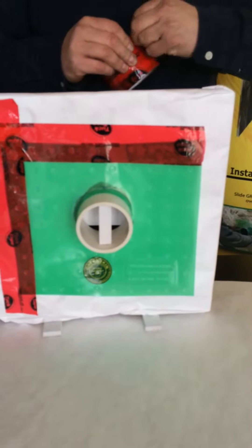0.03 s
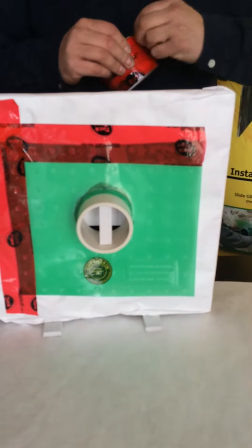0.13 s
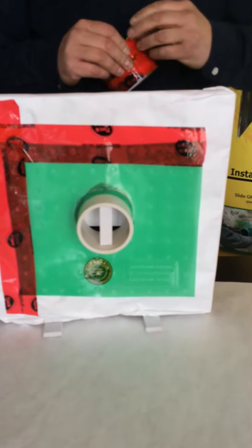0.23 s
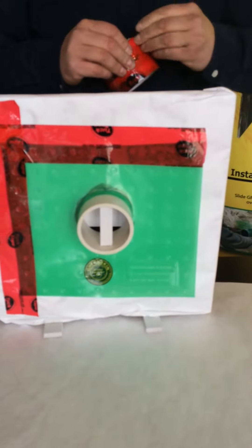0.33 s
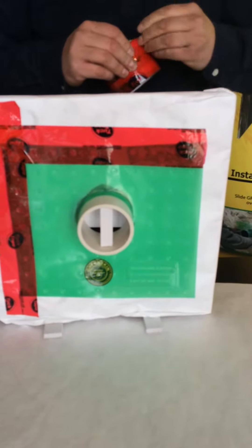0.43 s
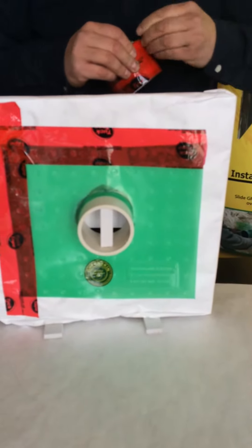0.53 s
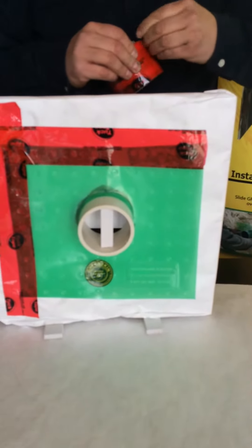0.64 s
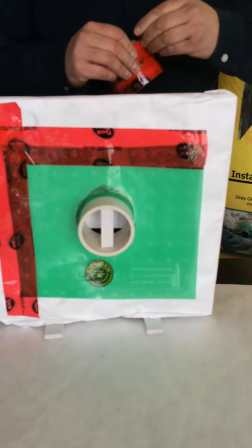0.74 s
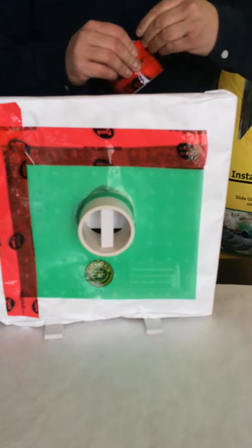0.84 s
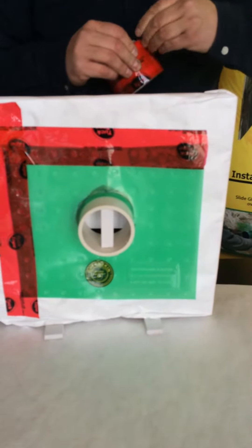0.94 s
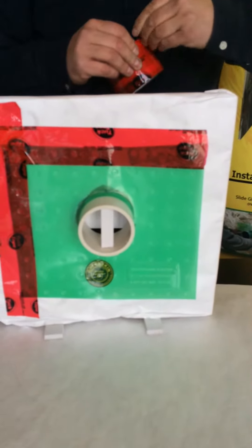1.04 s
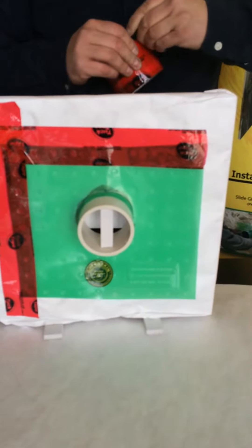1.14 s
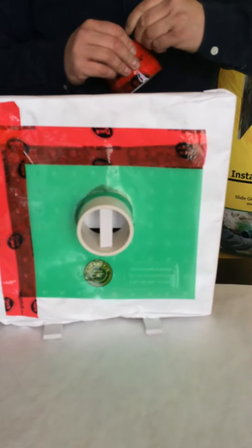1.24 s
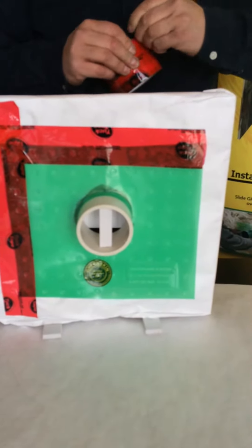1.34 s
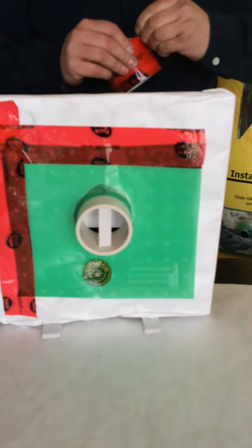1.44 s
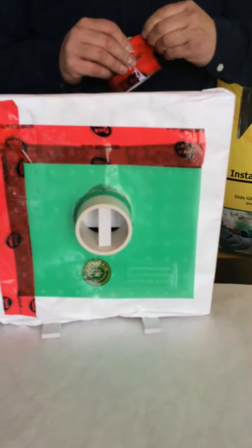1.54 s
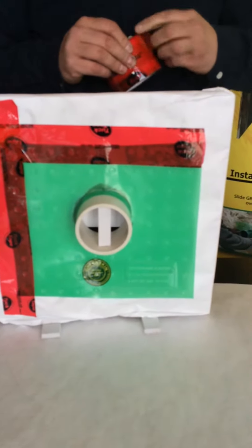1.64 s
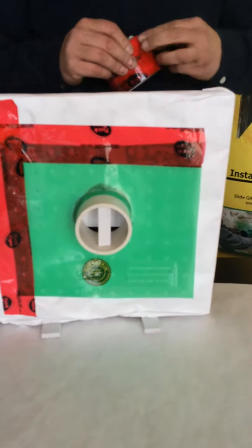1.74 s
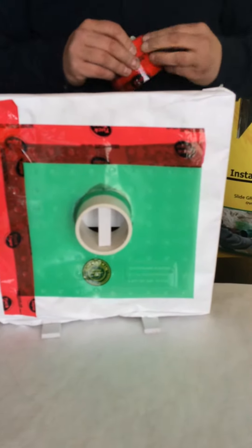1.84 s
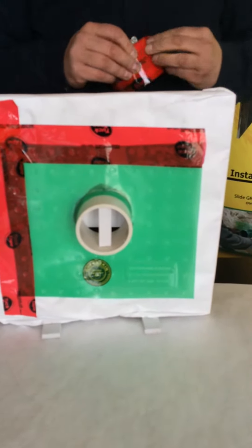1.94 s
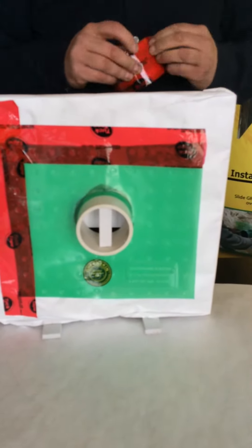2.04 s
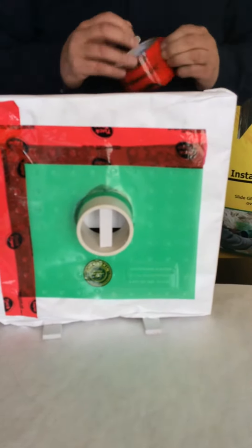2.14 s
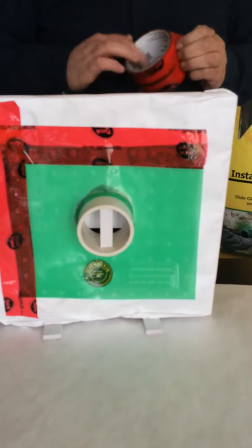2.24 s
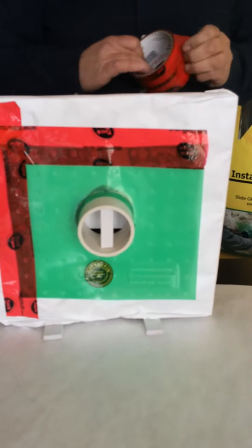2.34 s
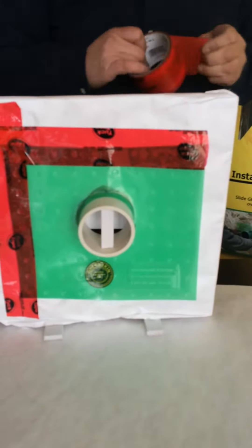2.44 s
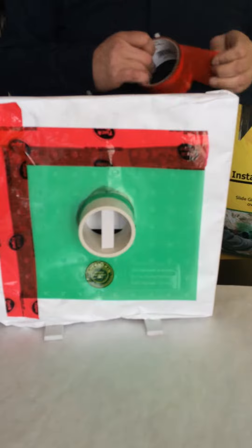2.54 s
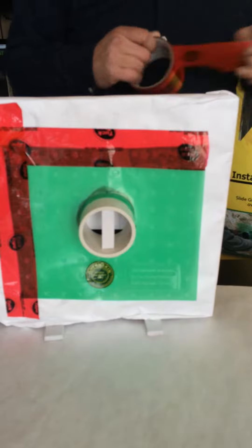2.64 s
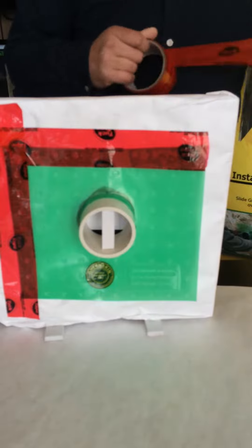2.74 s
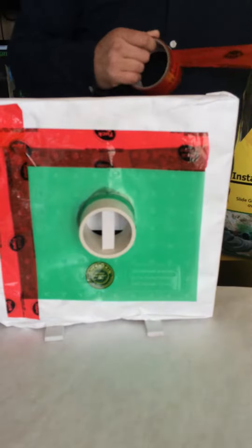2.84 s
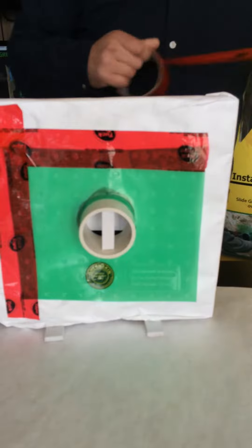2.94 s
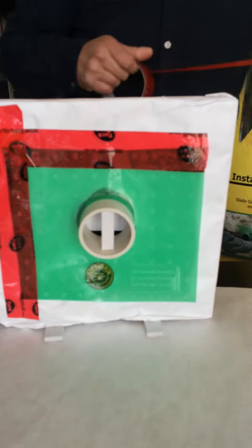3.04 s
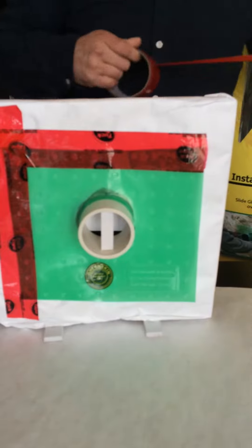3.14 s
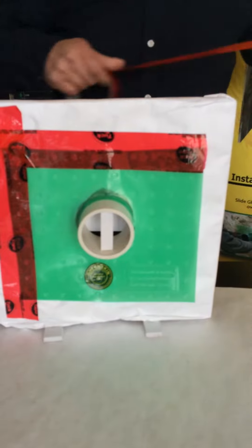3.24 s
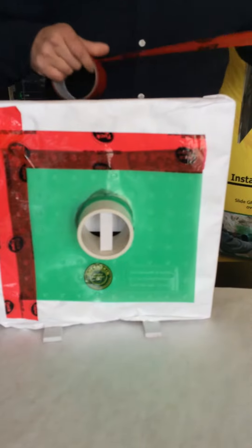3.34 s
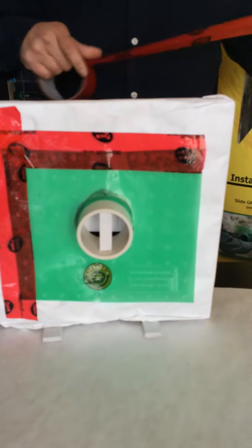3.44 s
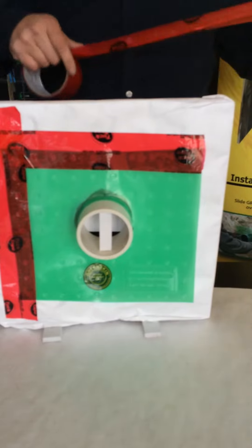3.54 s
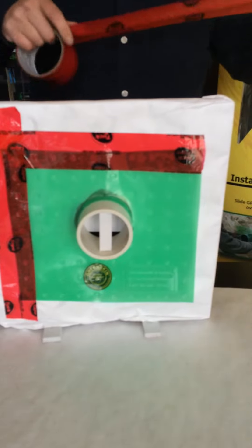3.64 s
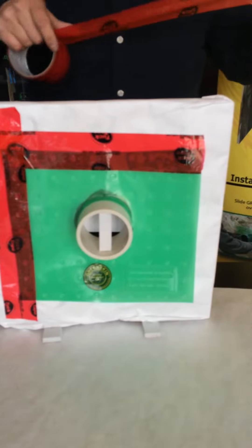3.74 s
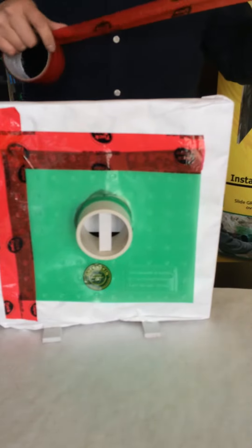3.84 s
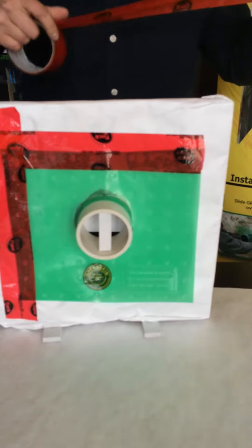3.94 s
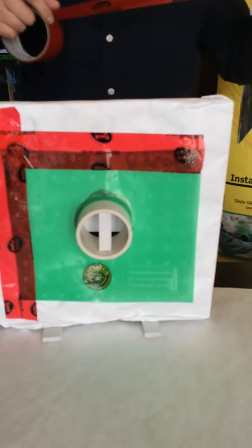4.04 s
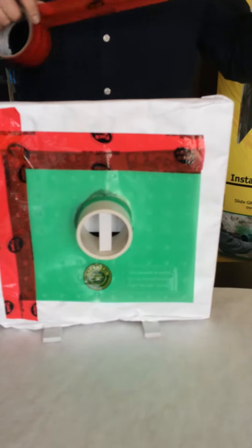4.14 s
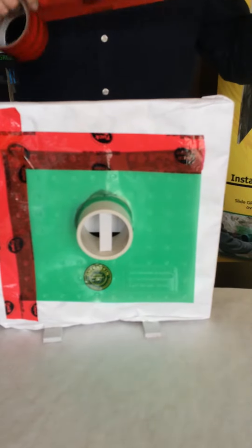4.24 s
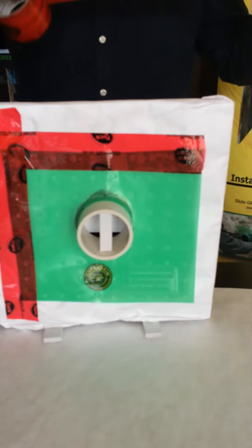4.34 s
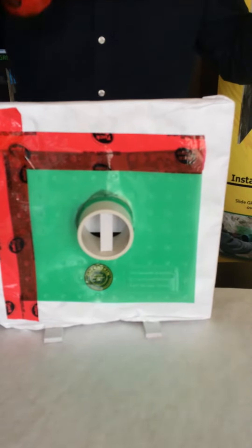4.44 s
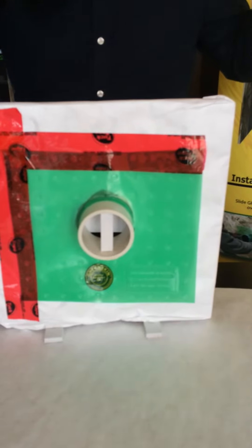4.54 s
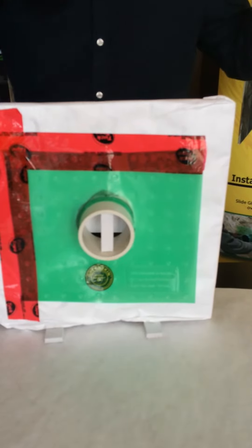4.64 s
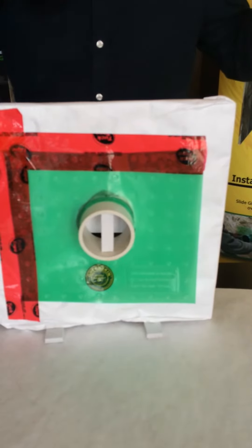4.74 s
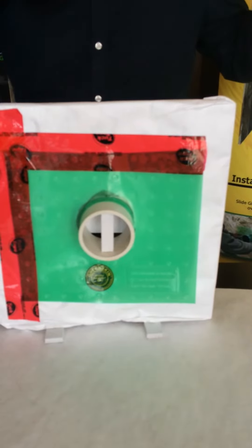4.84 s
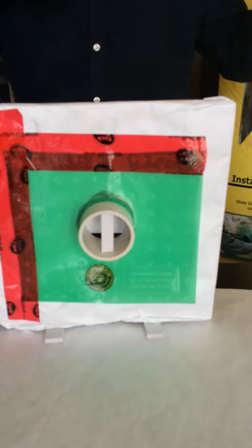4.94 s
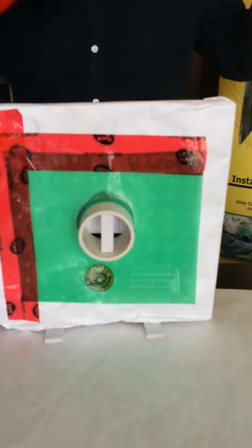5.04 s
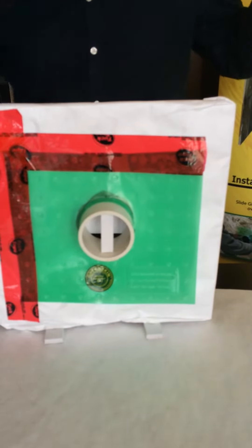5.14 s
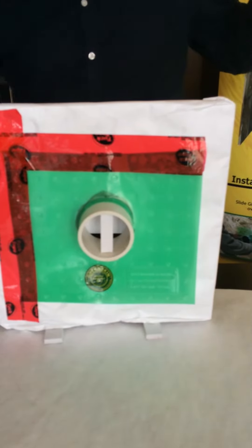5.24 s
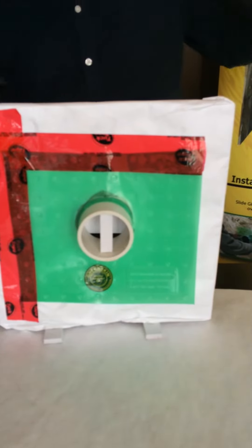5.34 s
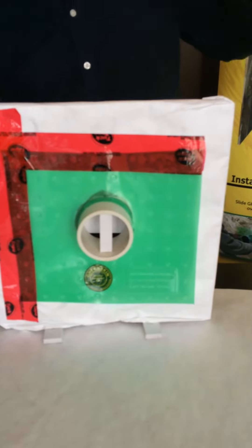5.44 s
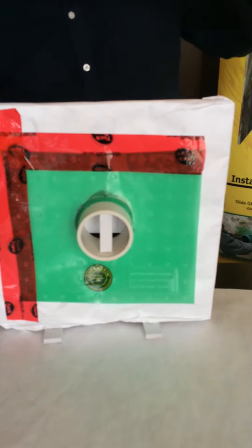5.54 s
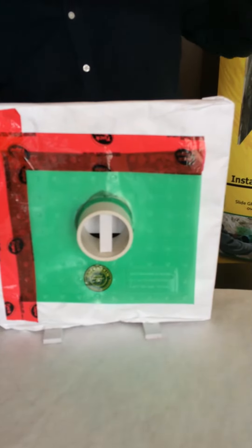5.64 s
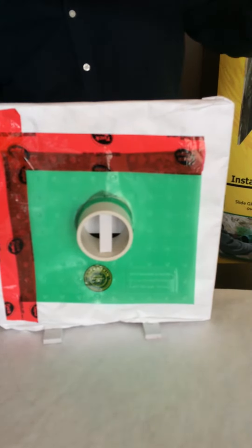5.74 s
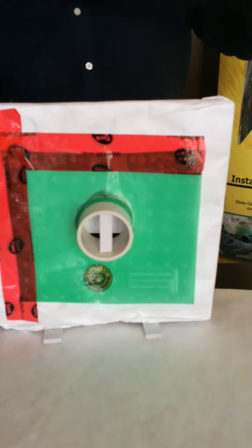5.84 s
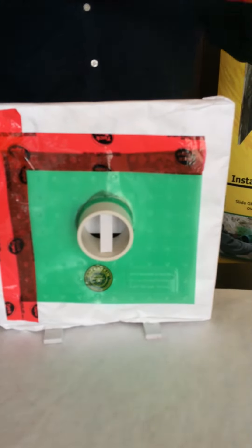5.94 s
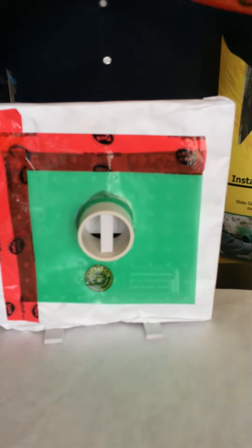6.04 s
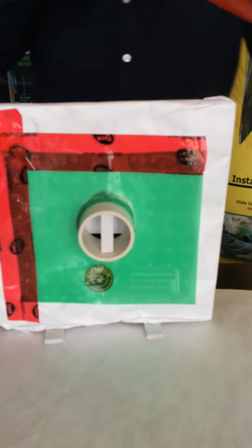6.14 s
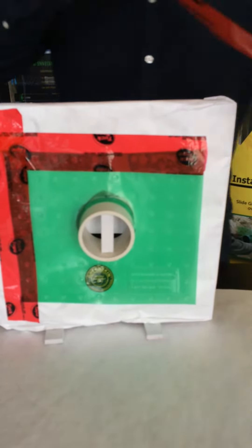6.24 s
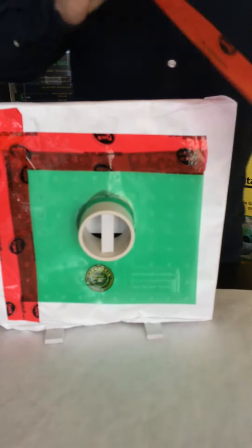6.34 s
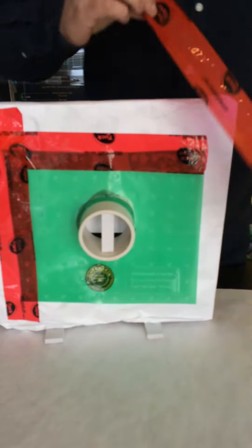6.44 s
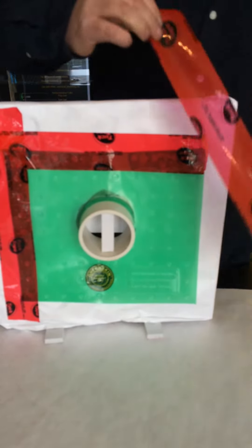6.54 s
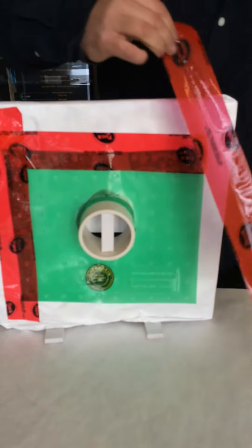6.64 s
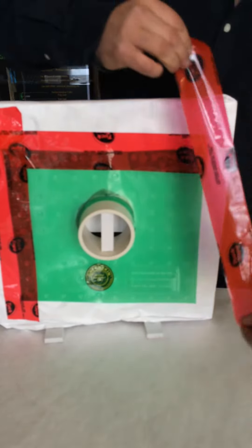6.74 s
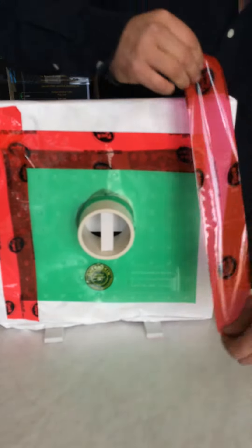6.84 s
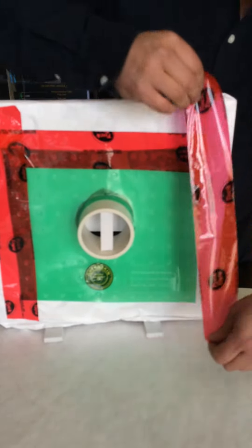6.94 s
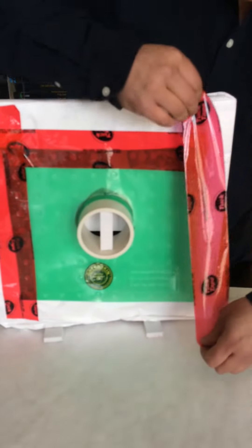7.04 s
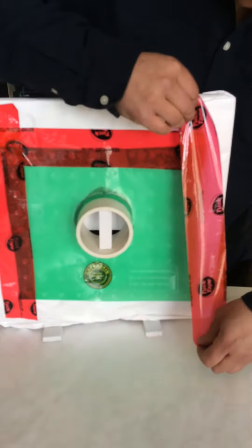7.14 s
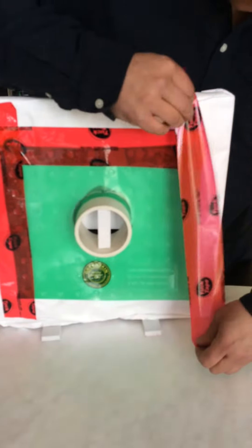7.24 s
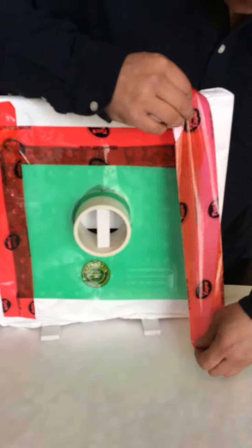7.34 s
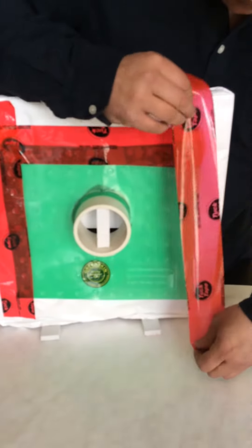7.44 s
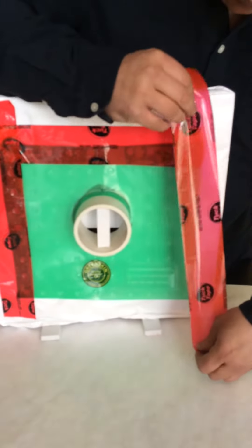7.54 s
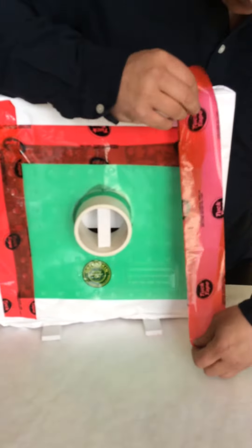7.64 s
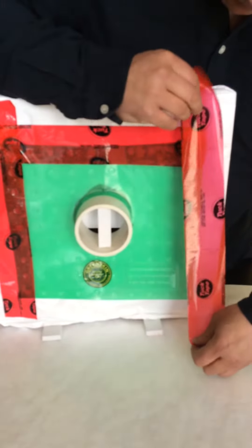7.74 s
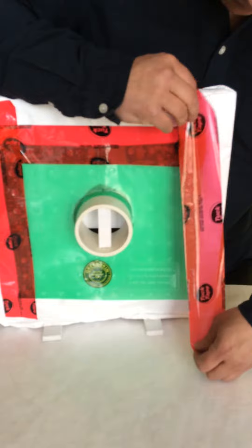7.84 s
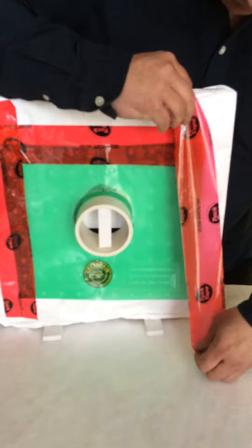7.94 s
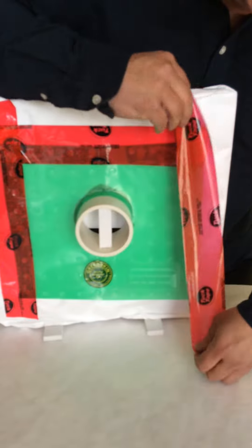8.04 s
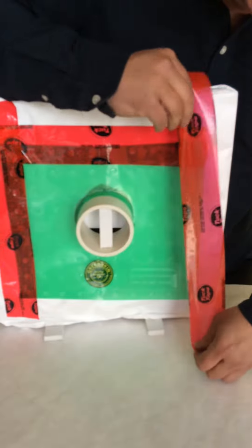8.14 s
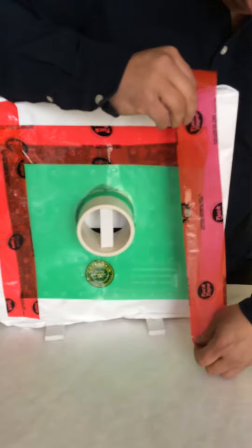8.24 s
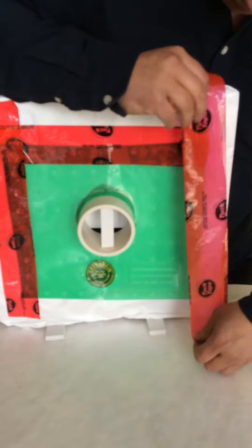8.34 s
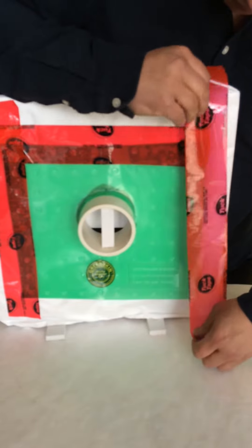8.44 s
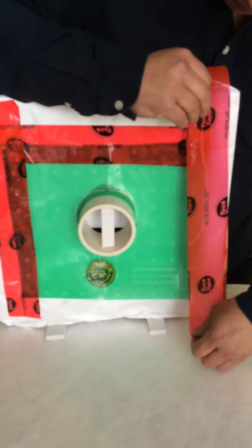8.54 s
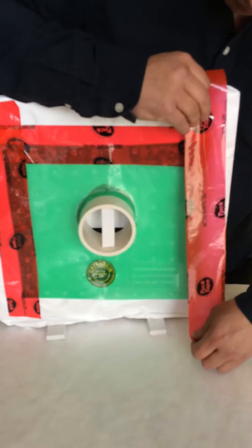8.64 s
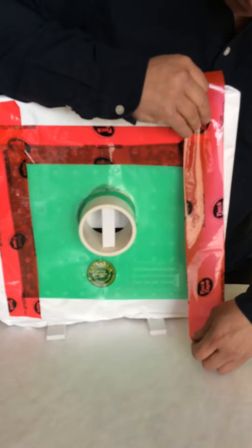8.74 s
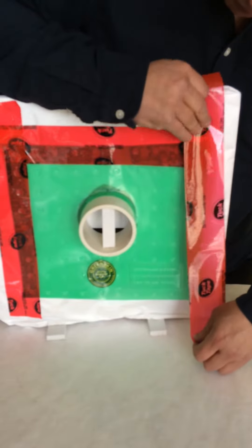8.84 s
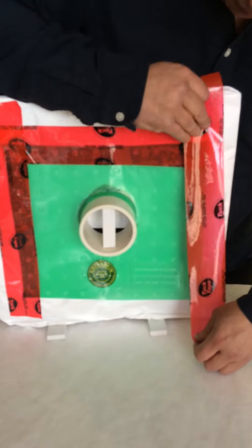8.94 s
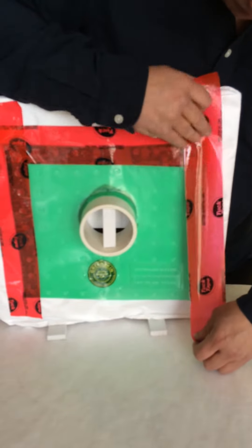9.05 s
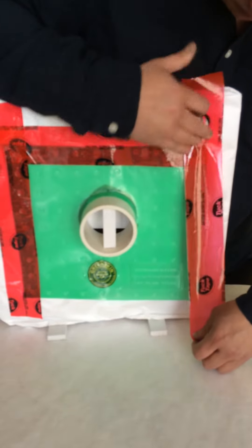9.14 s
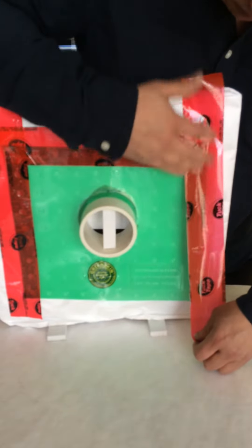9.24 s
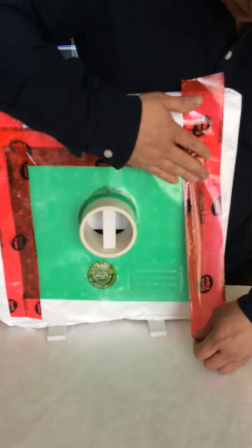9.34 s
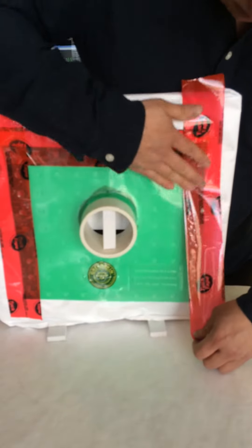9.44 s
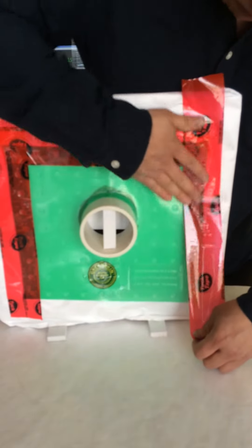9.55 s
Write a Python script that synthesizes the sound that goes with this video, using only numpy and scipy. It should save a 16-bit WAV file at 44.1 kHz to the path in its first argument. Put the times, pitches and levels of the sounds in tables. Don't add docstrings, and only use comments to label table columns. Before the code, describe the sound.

Loud bursts of peeling packing tape, a snap and tear, a roll dropping on a bench, then soft plastic crinkles and rubbing.

```python
import sys
import numpy as np
from scipy import signal
from scipy.fft import rfft, irfft, next_fast_len
from scipy.io import wavfile
from scipy.ndimage import uniform_filter1d, map_coordinates

SR = 44100
rng = np.random.default_rng(int(sys.argv[2]) if len(sys.argv) > 2 else 0)


def amplitude_ratio(level_db):
    exponent = np.asarray(level_db, float) / 20
    return 10 ** exponent


def bounce(signal):
    frames = np.transpose(np.atleast_2d(signal))
    limited = np.clip(frames, -1, 1)
    pcm = np.round(limited * 32767).astype(np.int16)
    wavfile.write(sys.argv[1], SR, pcm)


N = 423360


def rips():
    # start in seconds, length in seconds, film in dB, swell in dB.
    rip_runs = [(2.477, 0.03, -21.5, 5), (2.548, 0.014, -22.5, -1.5), (2.709, 0.021, -22.5, -1.5),
                (2.733, 0.02, -22, -0.5), (2.753, 0.053, -25.5, 3.5), (2.811, .019, -25, 2.5),
                (3.034, .018, -27.5, 1.5), (3.061, 0.027, -25, -1), (3.099, 0.032, -30, -2),
                (3.273, 0.048, -29, 5), (3.321, 0.036, -26.5, 8.5), (3.362, 0.062, -30, -10.5),
                (3.57, 0.045, -32, 8.5), (4.237, .018, -31, -1.5), (4.26, 0.0073, -37.5, -0.5),
                (6.068, 0.059, -58, 6.5), (9.075, 0.0052, -58.5, -8), (9.153, 0.032, -42, -2),
                (9.446, 0.0099, -41, 1.5)]
    # time in seconds, pitch in Hz, boom over film in dB.
    span_growth = [(2.48, 895, -21), (2.55, 786, -0.5), (2.709, 600, 0.5), (3.037, 560, -2.5),
                   (3.069, 420, 4), (3.102, 334, 6), (3.33, 380, 4), (3.6, 296, -3), (4.24, 324, 3),
                   (6, 900, -1)]
    glue_fizz_db, fresh_fizz_db, fresh_s = 6, -0.5, 0.03
    roll_body_db, belly_share = -9, 0.38
    overrun_s, stop_s = 0.04, 0.012
    t = np.arange(N) / SR
    gain, boom = np.zeros((3, N)), np.zeros(N)
    threads = slips(spread_db=2.2, clump_db=2, clump_rate=450)
    since, span_hz, span_boom_db = np.transpose(span_growth)
    stopped = 0
    for s, length, db, swell_db in rip_runs:
        a = round(s * SR)
        u = t[:round((length + overrun_s) * SR)]
        b = a + len(u)
        run = threads[a:b]
        swell = swell_db * (u / length - 0.5)
        stop = 60 * np.maximum(u - length, 0) / stop_s
        shape = amplitude_ratio(db + swell - stop) / np.sqrt(np.mean(run[u < length] ** 2))
        fizz_db = glue_fizz_db + fresh_fizz_db * np.clip((s - stopped) / fresh_s, 0, 1)
        gain[1:, a:b] = np.maximum(gain[1:, a:b], shape * amplitude_ratio([[-1.2], [fizz_db]]))
        hz = np.interp(s, since, span_hz)
        boom_db = np.interp(s, since, span_boom_db)
        boom[a:b] += drum(amplitude_ratio(boom_db) * shape * run, hz)
        belly = amplitude_ratio(roll_body_db) * min(1, 400 / hz) ** 3
        boom[a:b] += drum(belly * shape * run, belly_share * hz)
        stopped = s + length
    return boom + patches(sounded(gain * threads), depth_db=2.5)


def slips(spread_db, clump_db, clump_rate):
    spikes = rng.standard_normal(N) * amplitude_ratio(spread_db * rng.exponential(size=N))
    return unit(spikes * amplitude_ratio(clump_db * wobble(clump_rate)))


def drum(x, hz):
    low = signal.lfilter(*signal.iirpeak(hz, 5, SR), x)
    high = signal.lfilter(*signal.iirpeak(2.1 * hz, 1.2, SR), x)
    both = low + 0.45 * min(1, 550 / hz) ** 2 * high
    y = signal.sosfilt(signal.butter(2, 0.45 * hz, "high", fs=SR, output="sos"), both)
    return y * np.linalg.norm(x) / np.linalg.norm(y)


def sounded(drive):
    # frequency in Hz, density in dB per Hz.
    boom_colour = [(40, -38.5), (150, -2), (300, -7), (650, -1.5), (1000, 1.5), (1600, -17.5),
                   (3000, -56.5)]
    film_colour = [(400, -28.5), (900, -4), (1350, -3), (2000, 2.5), (3400, 1.5), (5000, -3), (7000, -6),
                   (12000, -48.5)]
    fizz_colour = [(2000, -44.5), (4000, -11), (5500, -1.5), (7200, 2.5), (9500, -0.5), (14000, -2.5),
                   (20000, -8)]
    colours = (boom_colour, film_colour, fizz_colour)
    return sum(signal.oaconvolve(d, voice(colour))[:N] for d, colour in zip(drive, colours))


def snaps():
    rows = slip_rows()
    t = np.arange(400) / SR
    chance = rng.standard_normal((len(rows), len(t)))
    drive, bare = np.zeros((2, 3, N + len(t)))
    for (s, ms, db, boom_db, fizz_db), noise in zip(rows, chance):
        a = round(s * SR)
        size = amplitude_ratio(db + np.array([[boom_db - 1], [0], [fizz_db]]))
        tick = noise * amplitude_ratio(-60 * t / (0.0045 * max(ms, 0.2)))
        tick[0] = 2.5
        drive[:, a:a + len(t)] += size * tick / np.linalg.norm(tick)
        bare[:, a] += size[:, 0]
    return sounded(drive[:, :N]), sounded(bare[:, :N])


def slip_rows():
    # start in seconds, gap in ms, first slip in dB, swell in dB a slip, boom over film in dB.
    chatter_pulls = [
        (3.572, 6.2, -7, 1.5, -10.5),
    ]
    # time in seconds, film energy in dB.
    corner_lifts = [(9.1339, -12), (9.1451, -7.5), (9.1504, -11), (9.1609, -12), (9.1854, -12),
                    (9.189, -21.5), (9.203, -22)]
    # time in seconds, film energy in dB, fizz over film in dB.
    nail_picks = [(.7312, -51, 15.5), (.8509, -46, 7), (1.0393, -39.5, 6), (1.3488, -51, 9),
                  (1.3765, -56, 17.5), (1.4386, -53.5, 17), (1.4868, -32.5, 9.5), (1.5203, -18, 15),
                  (1.5338, -33, 16.5), (1.5394, -18, 20), (1.5433, -21, 15), (1.5572, -15, 9),
                  (1.5672, -13, 16.5), (1.5855, -26.5, 10), (1.5931, -24.5, 14), (1.5979, -19.5, 11),
                  (1.7454, -36, 12.5), (1.7521, -46.5, 12), (2.0368, -34.5, -4), (2.0463, -30, -16),
                  (2.06, -33, 3.5), (2.0662, -29, 3.5), (2.0741, -25.5, -4.5), (2.2732, -50, 19.5),
                  (2.3035, -23, 3.5), (2.3791, -43.5, 10), (2.3919, -46, 18.5), (2.4284, -22, 17.5),
                  (2.4312, -9, 19), (2.4737, -22, 11)]
    # time in seconds, film energy in dB, boom over film in dB, fizz over film in dB.
    strip_creases = [(3.9582, -28.5, -26.5, 3.5), (4.1196, -40, -22.5, -4.5), (4.1449, -37.5, -20.5, 7),
                     (4.1726, -36, -11, 9), (4.2125, -36.5, -17.5, 18.5), (4.2381, -1.5, -4.5, -2),
                     (4.2754, 4, -9, 1), (4.5972, -31, -18, -19.5), (4.6236, -34, -8, -6),
                     (4.692, -22, -14, -9), (4.834, -29.5, 1, -30), (4.9093, -32, -43, -29),
                     (5.0303, -43, 8.5, -2.5), (5.0701, -26, 2.5, -3.5), (5.0957, -37, 4.5, 14),
                     (5.1226, -3.5, -22, 8), (5.153, -19.5, -13.5, -2.5), (5.137, -20.5, 10.5, 8.5),
                     (5.5399, -32.5, -11, 17), (5.5837, -21.5, -5.5, 8), (5.6157, -8, -23, -7),
                     (6.0807, -19, -6, -36), (6.1176, -15.5, -11, -28), (6.306, -21, -8, -3),
                     (6.3396, -27.5, -31, 3.5), (6.5056, -26, -15, 1), (6.5163, -28, -19, -11),
                     (6.7413, -18.5, -1, -4.5), (6.9006, -28.5, -8.5, -8)]
    sheet_presses = [(7.1708, -28, -12.5, -33), (7.3344, -18, -0.5, 3), (7.3549, -5, -15, 1),
                     (7.5356, -26, 4, -5), (7.5681, -17.5, -1.5, -3.5), (7.7964, -29, -2, 0),
                     (7.9, -33, -23, -7), (7.9918, -19.5, -8, 2), (8.0647, -27.5, -21, 2),
                     (8.101, -13.5, -10, 4), (8.4346, -27.5, -5, 0), (8.5107, -27.5, 3, -15.5),
                     (8.7436, -38, -9, -19.5), (8.9063, -30, -10, 3.5), (8.9407, -13.5, -14, -31.5),
                     (9.0477, -29.5, 1, -16), (9.079, -11.5, -10.5, -19), (9.0872, -18, -10, -23),
                     (9.3021, -5, -7, -21.5), (9.378, -18, -28, -16.5), (9.4139, -7.5, -22, -16),
                     (9.451, -3, -12, -21), (9.4531, -16.5, 0, -10.5), (9.4591, -12, -7, -10),
                     (9.4798, -15, -16, -18), (9.5092, -12.5, -20, -9), (9.5464, -17, -9, -8.5)]
    pick_ms, crease_ms, press_ms, chatter_ms = 1.3, 3, 3, 2
    chatter_fizz_db, scatter_ms = 3.5, 0.55
    rows = []
    for s, gap_ms, db, swell_db, boom_db in chatter_pulls:
        for k in range(8):
            late_ms = scatter_ms * rng.standard_normal() * (k > 0)
            when = s + (k * gap_ms + late_ms) / 1000
            rows.append((when, chatter_ms, db + k * swell_db, boom_db, chatter_fizz_db))
    for s, db in corner_lifts:
        rows.append((s, chatter_ms, db, -7, chatter_fizz_db))
    for s, db, fizz_db in nail_picks:
        boom_db = -11.5 - 0.31 * (fizz_db - 9)
        rows.append((s, pick_ms, db, boom_db, fizz_db))
    rows += [(s, crease_ms, *levels) for s, *levels in strip_creases]
    rows += [(s, press_ms, *levels) for s, *levels in sheet_presses]
    return rows


def sheeting(ticks):
    # frequency in Hz, width in Hz, level in dB.
    sheet_modes = [(1040, 630, 3), (1937, 37, 2), (2400, 280, -7), (3975, 50, 4)]
    touching = np.arange(N) / SR > 6.8
    return filtered(ticks * touching, lambda f: 1.1 * modes(sheet_modes)(f) - 0.3)


def squeaks():
    # start in seconds, length in seconds, frequency in Hz, width in Hz, level in dB.
    narrow_rings = [(2.547, 0.015, 793, 121, -29), (3.932, 0.07, 4180, 700, -56.5),
                    (4.06, .17, 2830, 60, -70), (5.149, 0.013, 1000, 500, -41),
                    (6.063, 0.07, 3620, 2000, -48)]
    out = np.zeros(N)
    grains = slips(spread_db=2, clump_db=3, clump_rate=150)
    for s, length, hz, width, db in narrow_rings:
        a, n = round(s * SR), round(length * SR)
        peak = signal.iirpeak(hz, hz / width, SR)
        song = signal.lfilter(*peak, signal.lfilter(*peak, grains[a:a + n]))
        out[a:a + n] += amplitude_ratio(db) * np.sqrt(np.hanning(n)) * unit(song)
    return out


def flaps():
    # time in seconds, spike pressure, slow swing pressure, spike width in ms.
    air_pushes = [(2.777, 0.12, 0.02, .85), (2.828, 0.056, .01, .79), (3.59, 0.049, 0.0035, .6),
                  (4.241, 0.014, 0.0073, 0.97), (5.123, 0.36, 0.095, 0.37)]
    swing_hz, swing_s, early_s = 83, 0.0086, 0.0015
    out, t = np.zeros(N), np.arange(-SR // 30, SR // 30) / SR
    early = t + early_s
    swing = np.cos(2 * np.pi * swing_hz * early) * np.exp(-(early / swing_s) ** 2)
    for s, spike, slow, ms in air_pushes:
        a = round((s + t[0]) * SR)
        out[a:][:len(t)] += spike * np.exp(-(t / (ms / 1000)) ** 2) + slow * swing
    return out


def drops():
    # time in seconds, level in dB.
    bench_hits = [
        (5.616, -20),
        (5.754, -23.5),
    ]
    cutter_falls = [
        (5.753, -28),
        (5.763, -48),
    ]
    # frequency in Hz, width in Hz, level in dB.
    bench_modes = [(60, 32, -14), (119.6, 5.7, 3), (139, 3.3, 2), (197, 25, -5), (291.7, 8.7, 2),
                   (387, 27, -5), (492, 44, -10), (630, 30, -8)]
    cutter_modes = [(1020, 260, 0), (1680, 400, -2.5), (2122, 220, -2.5), (2970, 590, -8.5)]
    return blow(bench_hits, bench_modes, soft_hz=1300) + blow(cutter_falls, cutter_modes, soft_hz=2820)


def core_ticks():
    # time in seconds, level in dB.
    end_ticks = [(5.54, -54), (5.5838, -47)]
    # frequency in Hz, width in Hz, level in dB.
    core_modes = [(6000, 420, 0.0)]
    return blow(end_ticks, core_modes, soft_hz=9000)


def sheet_pops():
    # time in seconds, level in dB.
    finger_pins = [(8.9406, -49.5), (9.078, -53), (9.3032, -49.5), (9.4144, -52)]
    # frequency in Hz, width in Hz, level in dB.
    taut_modes = [(2500, 320, 0.0012)]
    return blow(finger_pins, taut_modes, soft_hz=6000)


def frame_nudges():
    # time in seconds, level in dB.
    knuckle_nudges = [(6.942, -51), (6.961, -55)]
    # frequency in Hz, width in Hz, level in dB.
    frame_modes = [(199, 35, 0.0022)]
    return blow(knuckle_nudges, frame_modes, soft_hz=600)


def blow(events, table, soft_hz):
    push = np.zeros(N)
    for s, db in events:
        push[round(s * SR)] = amplitude_ratio(db + 55.0)
    return filtered(push, lambda f: modes(table)(f) / (1 + 1j * f / soft_hz) ** 2)


def rubbing():
    # time in seconds, effort in dB.
    hand_effort = [(0, -84), (.2, -77), (1.1, -78), (1.9, -78.5), (2.3, -68.5), (3.95, -70), (4.75, -77),
                   (5.5, -68), (6.1, -66), (6.27, -62.5), (6.62, -60), (6.8, -71.5), (7.0, -75),
                   (7.42, -66.5), (7.75, -67.5), (8.4, -65.5), (8.65, -73), (9.6, -63)]
    # peak time in seconds, level in dB, rise in seconds, fall in seconds, fizz over film in dB.
    palm_strokes = [(2.42, -74, .1, .05, 17), (4.23, -58, 0.059, .05, -13.5),
                    (5.115, -57.5, 0.12, 0.055, -6), (7.03, -61.5, 0.029, 0.43, -9),
                    (8.16, -79.5, 0.44, 0.22, 10), (8.25, -81, 0.026, .06, 22), (6.62, -71, 0.11, 0.12, 10),
                    (7.28, -72, 0.0315, .1, 13), (9.15, -43, 0.066, 0.12, -8),
                    (9.45, -46.5, 0.058, 0.16, -15)]
    crinkles_per_s, crinkle_db, crinkle_spread_db = 45, 3, 3
    t = np.arange(N) / SR
    effort_db = np.interp(t, *np.transpose(hand_effort))
    rub = amplitude_ratio(effort_db)
    fizz = amplitude_ratio(-71.5 + 0.95 * (effort_db + 69))
    for s, db, rise, fall, fizz_db in palm_strokes:
        stroke = amplitude_ratio(db - 20 * np.maximum((s - t) / rise, (t - s) / fall))
        rub = rub + stroke
        fizz = fizz + amplitude_ratio(fizz_db) * stroke
    grains = slips(spread_db=1.9, clump_db=2, clump_rate=50)
    fold_db = crinkle_db + crinkle_spread_db * np.minimum(rng.exponential(size=N), 3)
    folds = (rng.random(N) < crinkles_per_s / SR) * amplitude_ratio(fold_db)
    grains = grains * (1 + signal.lfilter([1], [1, -0.97], folds))
    return patches(sounded([amplitude_ratio(-3.5) * rub * grains, rub * grains, fizz * grains]), depth_db=-2.0)


def closeness():
    # from this time in seconds, wall level in dB.
    wall_share = [(0, -10.5), (2.42, -9), (3.02, -5), (3.56, -5), (4.55, -9.5), (5.11, -1.5), (5.5, -6.5),
                  (7.3, -10.5)]
    since, wet_db = np.transpose(wall_share)
    return amplitude_ratio(wet_db[np.searchsorted(since, np.arange(N) / SR, "right") - 1])


def room(x):
    # frequency in Hz, time to fall 60 dB in seconds.
    wall_decay = [(100, 0.61), (310, .31), (1200, 0.39), (4000, 0.46), (9000, 0.31), (15000, 0.19)]
    out, step = np.zeros(N + 2 * SR), SR // 7
    for a in range(0, N, step):
        hz, t, z = signal.stft(rng.standard_normal(SR * 3 // 5), SR, nperseg=256)
        colour_db = 1.6 * np.interp(np.log(hz + 200), np.linspace(5.3, 10, 16), rng.standard_normal(16))
        decay_db = 60 * t / along(wall_decay, hz)[:, None]
        tail = signal.istft(z * amplitude_ratio(colour_db[:, None] - decay_db), SR, nperseg=256)[1]
        tail = tail * np.minimum(np.arange(len(tail)) / (0.0071 * SR), 1) ** 2
        wet = signal.fftconvolve(x[a:a + step], tail / np.linalg.norm(tail))
        out[a:a + len(wet)] += wet
    return out[:N]


def drone():
    # frequency in Hz, density in dB per Hz.
    fan_noise = [(12, -41.5), (20, -15.5), (54, -2), (124, -6), (190, -12.5), (339, -18), (3000, -37.5),
                 (6600, -120)]
    # frequency in Hz, width in Hz, level in dB.
    fan_tones = [(115, 9.9, -0.5), (190.6, 2.5, -3), (281, 4.7, -11.5)]
    noise = unit(filtered(rng.standard_normal(N), lambda hz: amplitude_ratio(along(fan_noise, hz))))
    tones = unit(filtered(rng.standard_normal(N), modes(fan_tones)))
    return amplitude_ratio(0.6 * wobble(1)) * (amplitude_ratio(-62.5) * noise + amplitude_ratio(-61.5) * tones)


def gain_control(loud):
    share = 1 / (0.12 * SR)
    level = signal.lfilter([share], [1, share - 1], loud ** 2)
    return 1 / (1 + np.sqrt(np.abs(level)) / amplitude_ratio(-24.5))


def unit(x):
    return x / np.sqrt(np.mean(x ** 2) + 1e-20)


def along(points, hz):
    f, v = np.transpose(points)
    return np.interp(np.log(hz + 1), np.log(f + 1), v)


def wobble(rate):
    knots = rng.standard_normal(int(N * rate / SR) + 4)
    return map_coordinates(knots, [np.arange(N) * rate / SR])


def filtered(x, response):
    m = next_fast_len(N + SR // 2)
    return irfft(rfft(x, m) * response(np.fft.rfftfreq(m, 1 / SR)), m)[..., :N]


def modes(table):
    def response(f):
        total = 0
        for k, (centre, width, db) in enumerate(table):
            damping = 1j * f * width
            total = total + (-1) ** k * amplitude_ratio(db) * damping / (centre * centre - f * f + damping)
        return total
    return response


def voice(spectrum):
    cep = irfft(np.log(amplitude_ratio(along(spectrum, np.fft.rfftfreq(2048, 1 / SR)))))
    cep = cep * np.r_[1, 2 * np.ones(1023), np.zeros(1024)]
    h = irfft(np.exp(rfft(cep)))
    return h / np.linalg.norm(h)


def patches(x, depth_db):
    z = signal.stft(x, nperseg=256)[2]
    field = uniform_filter1d(rng.standard_normal(z.shape), size=8, axis=0)
    field = uniform_filter1d(field, size=4, axis=1)
    return signal.istft(z * amplitude_ratio(depth_db * unit(field)), nperseg=256)[1][:N]


def scene():
    peel = rips() + squeaks()
    ticks = np.array(snaps())
    near, bare = ticks + sheeting(ticks)
    dropped = drops()
    walls = room(closeness() * (peel + bare) + amplitude_ratio(-4) * dropped)
    small = core_ticks() + sheet_pops() + frame_nudges()
    loud = peel + near + small + dropped + walls + flaps()
    mix = loud + gain_control(loud) * drone() + rubbing()
    return np.tile(mix, (2, 1))


def top_cut(x):
    return signal.sosfilt(signal.butter(12, 16520, fs=SR, output="sos"), x)


def record(dry):
    edge_hz = 15350
    x = dry / (1 + np.abs(dry / 0.75) ** 6) ** (1 / 6)
    x = filtered(x, lambda hz: amplitude_ratio(-28 / (1 + np.exp(np.clip((edge_hz - hz) / 45, -50, 50)))))
    return top_cut(x)


dry = scene()
out = record(dry)
bounce(out)
```